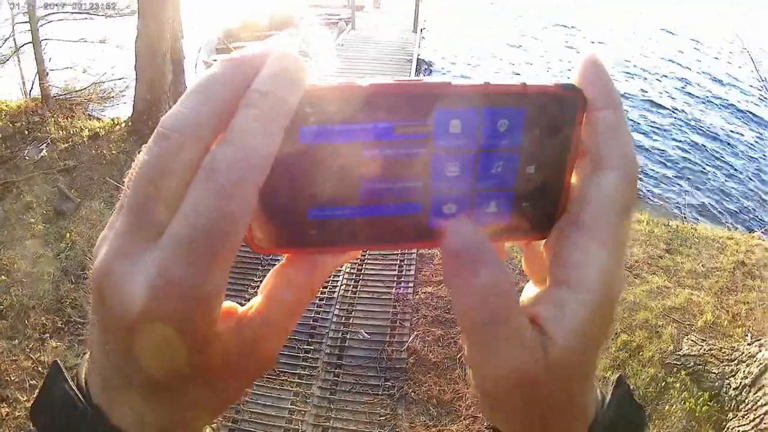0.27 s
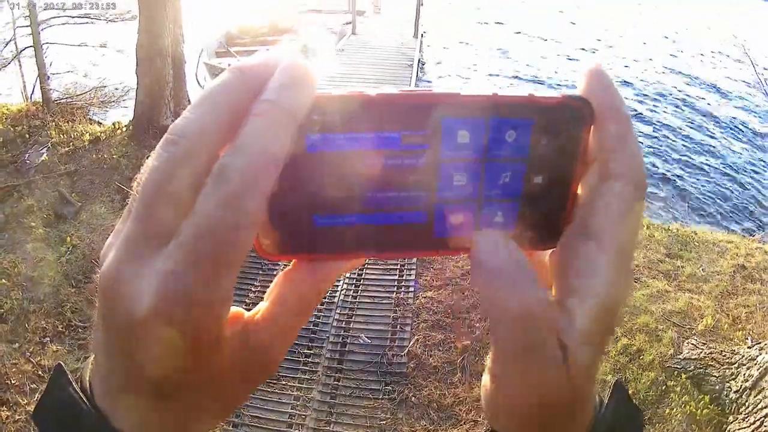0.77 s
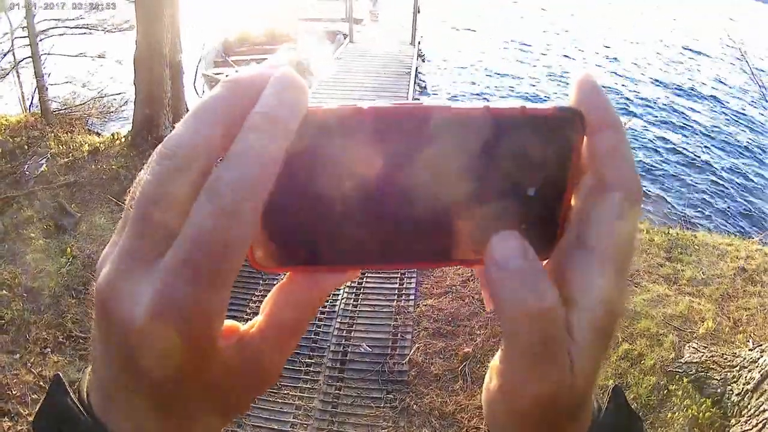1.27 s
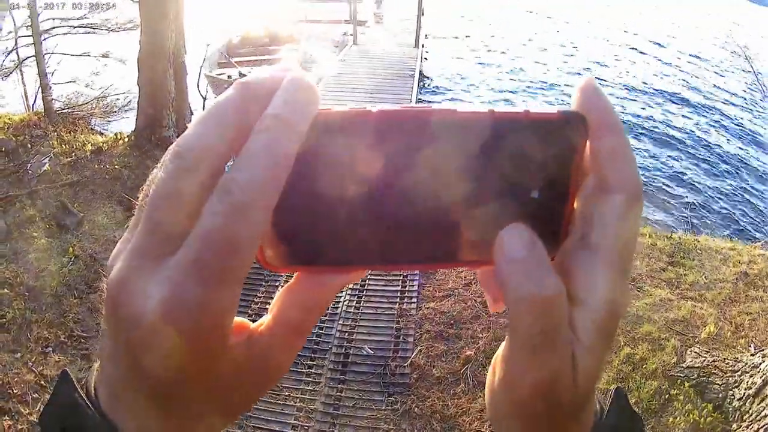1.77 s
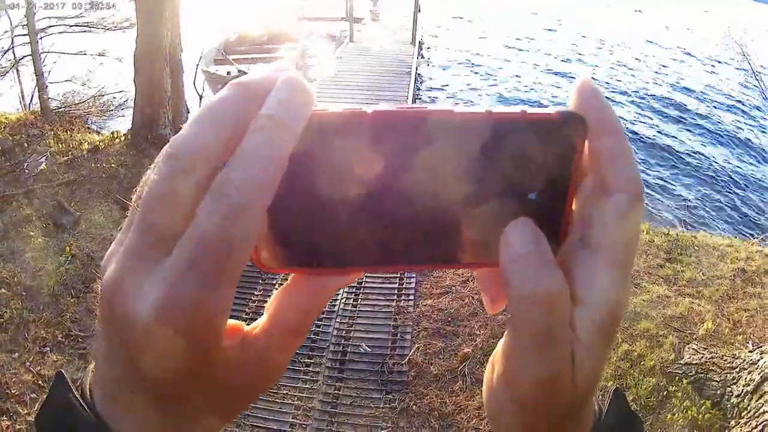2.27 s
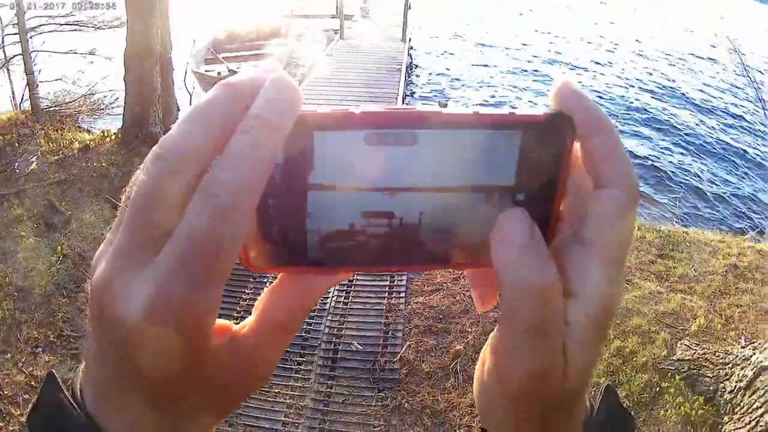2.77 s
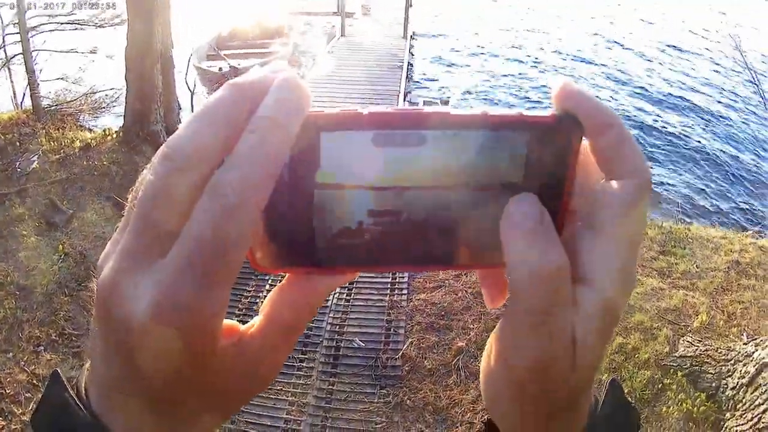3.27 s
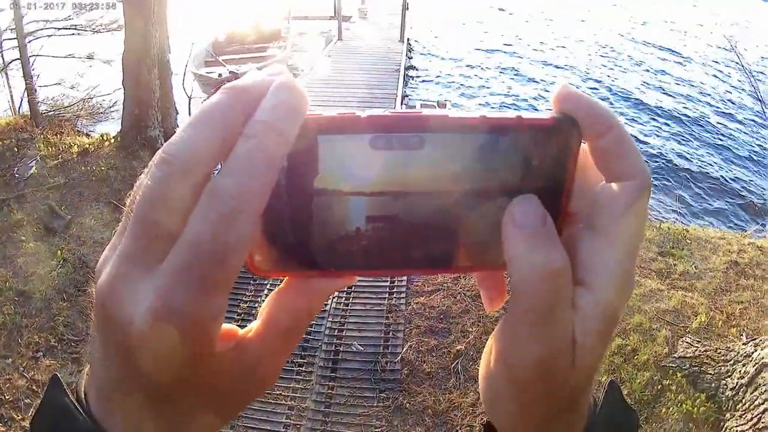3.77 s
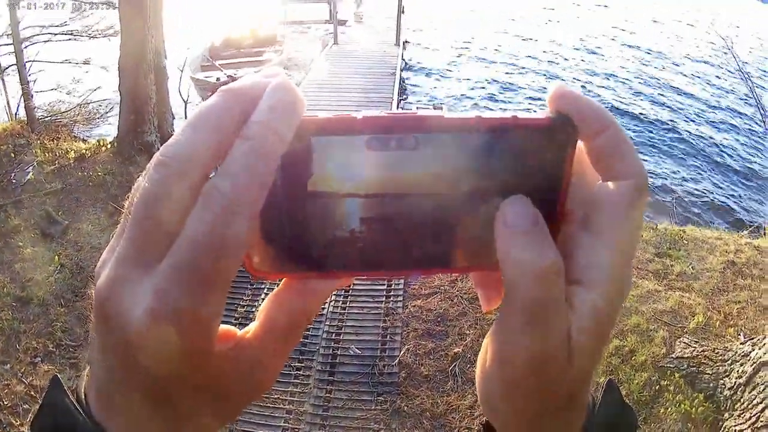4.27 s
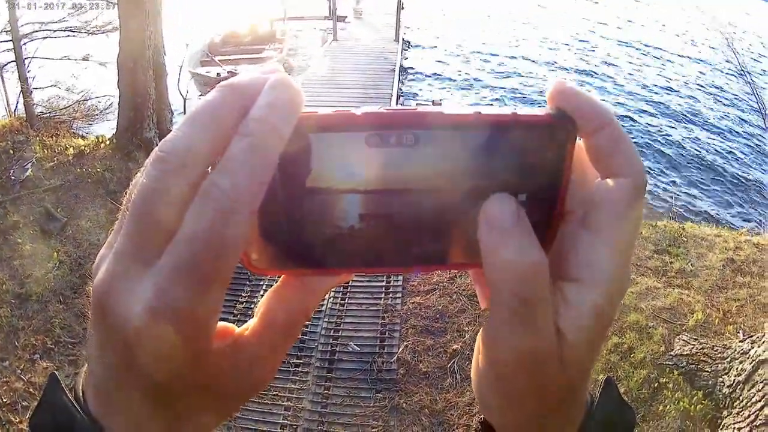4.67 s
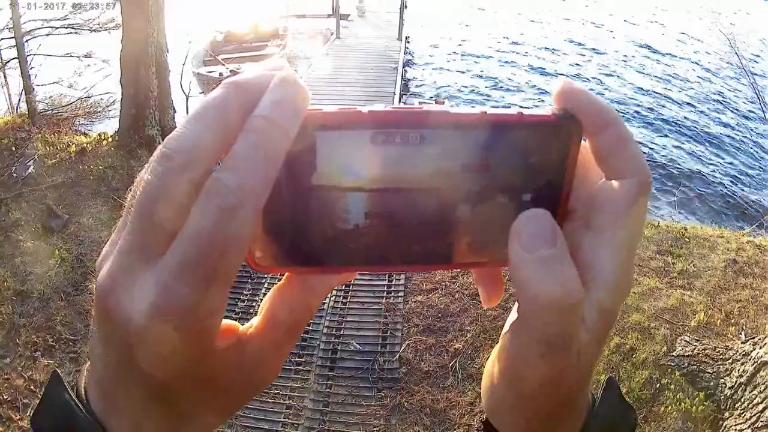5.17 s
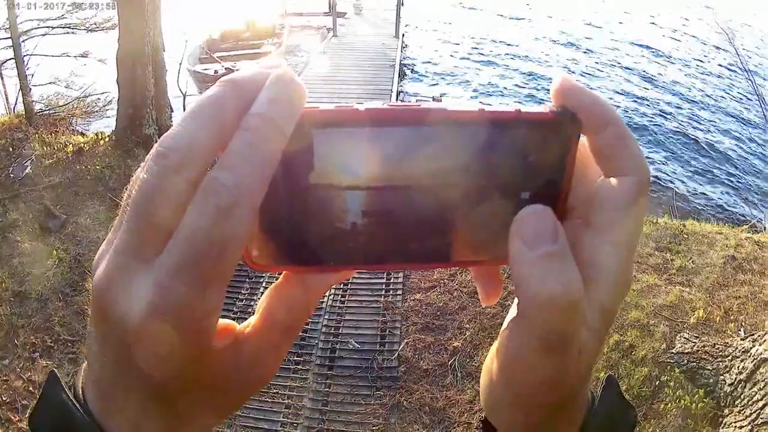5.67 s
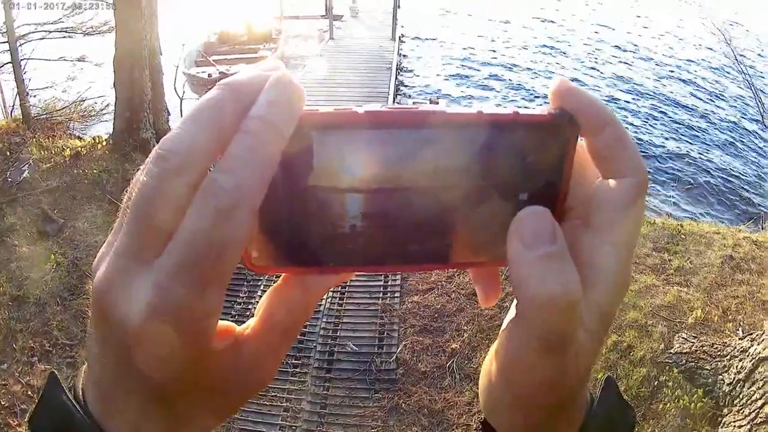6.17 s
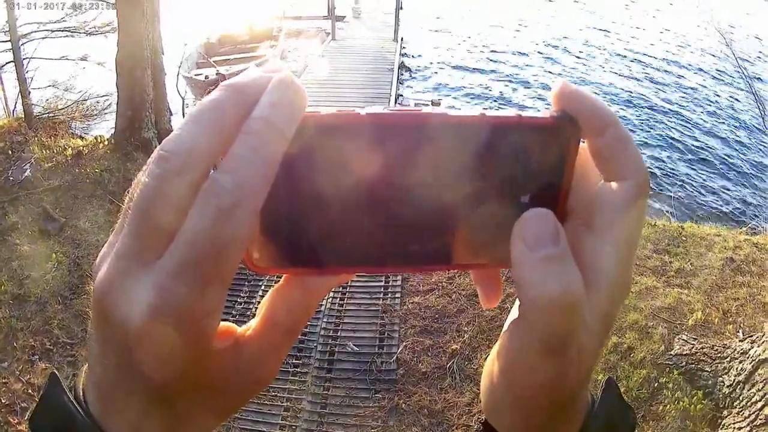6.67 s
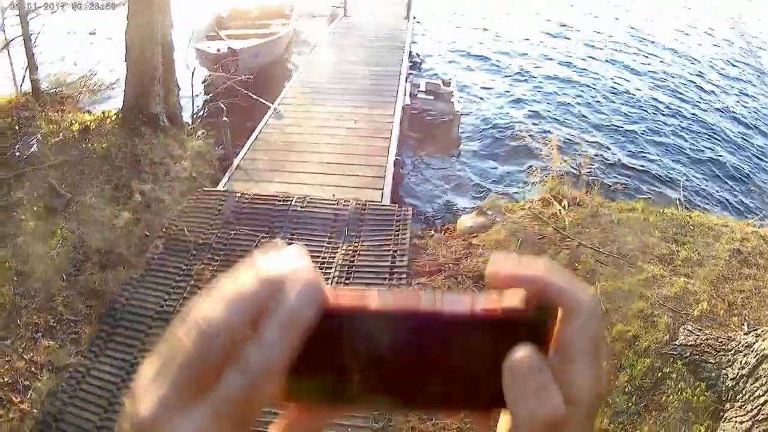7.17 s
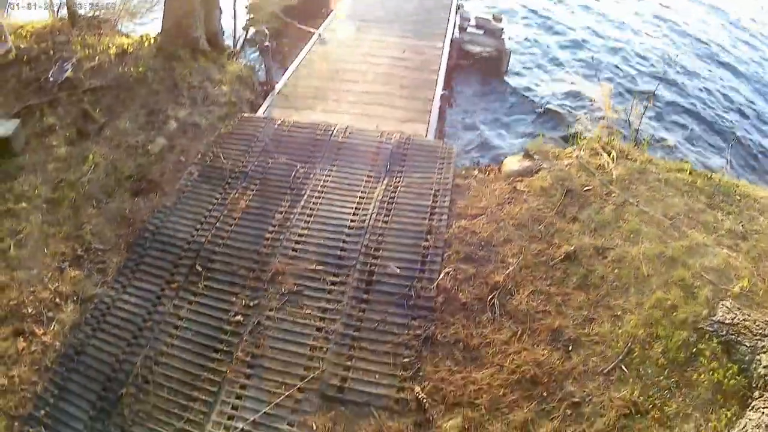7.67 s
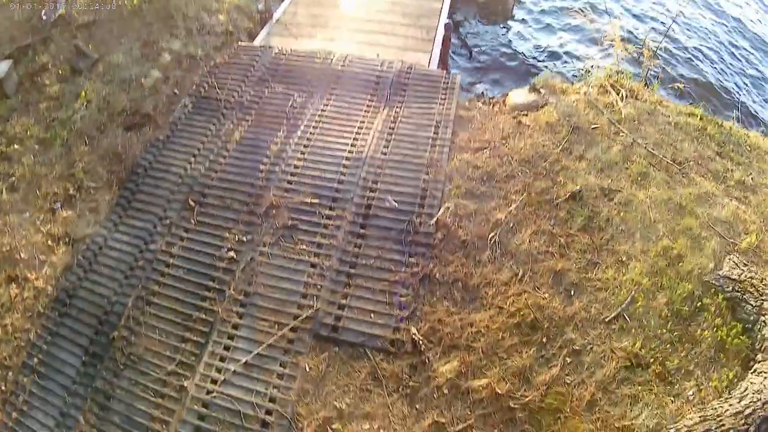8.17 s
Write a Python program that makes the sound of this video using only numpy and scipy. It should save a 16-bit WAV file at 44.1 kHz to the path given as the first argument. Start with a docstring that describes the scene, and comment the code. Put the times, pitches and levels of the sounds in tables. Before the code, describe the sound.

A windy lakeside heard through a small, band-limited camera microphone a few metres from a wooden dock. From 0 s, quiet choppy water laps and gurgles under boards, mostly midrange and bubbly, with thin spray. Surges leap up quickly and sink back, with soft knocks around 0.2 and 0.45 s and a calmer gap near 1 s. A clearer hollow wood knock with splash comes at 1.4 s, others near 1.9, 2.3, 2.7 and 3.4 s, irregular and short. Brief bubbling gulps, mostly gliding upward, fill between, thickest around 4-4.5 s. Another knock falls at 5.35 s. Lapping swells around 6.1 s as wind puffs strengthen. From 6.6 to 8 s, heavy low wind buffeting thumps and flattens on the microphone, over fuller water and dull knocks near 7.3, 7.5, 7.6 and 7.9 s. Wind eases towards 8.4 s, after a last dull knock. Faint hiss and very weak high whine persist.

```python
"""A wooden dock on a lake: choppy water laps and gurgles under it and knocks its boards and a moored hull.
Shaped noise and swarms of ringing bubbles make the lapping. Lapping, spray and wind leap up together and sink
back, often at a knock. Gliding tones are air pockets closing under the boards; damped wood modes with splashes
are the knocks. Clipped low noise is wind on the microphone port of a small chest camera some metres away,
harder towards the end. The camera samples slowly, so faint mirror images of the low sounds stand in the treble."""
import sys
import numpy as np
from scipy import signal
from scipy.fft import rfft, irfft, next_fast_len
from scipy.io import wavfile
from scipy.ndimage import uniform_filter1d, map_coordinates

SR = 44100
rng = np.random.default_rng(int(sys.argv[2]) if len(sys.argv) > 2 else 0)


def dump(signal):
    """Clip the signal to [-1, 1] and save it as 16-bit WAV at the path in sys.argv[1]."""
    limited = np.clip(np.atleast_2d(signal).T, -1, 1)
    pcm = np.round(limited * 32767).astype(np.int16)
    wavfile.write(sys.argv[1], SR, pcm)


N = 371319  # length [samples]

# Surges of wind noise on the port, many of them at knocks:
# (time [s], hold [s], buffet level before trim [dB], boom level before trim [dB])
WIND_SURGES = [(0, 0.092, -67, -55), (0.227, 0.07, -76, -58), (0.453, 0.054, -73.5, -44),
               (.56, 0.12, -60, -57), (0.683, 0.061, -69, -50.5), (1.381, 0.1, -46.5, -44),
               (1.592, .1, -63, -59), (1.77, 0.046, -58, -51), (1.868, 0.085, -55.5, -54.5),
               (2.295, 0.11, -53.5, -52.5), (2.458, 0.066, -54, -71), (2.734, .08, -57, -53),
               (2.847, 0.028, -45, -60), (2.912, 0.081, -50.5, -49), (3.098, 0.11, -54, -57),
               (3.388, 0.098, -41.5, -51.5), (3.68, 0.083, -67, -59.5), (3.86, 0.095, -49, -63),
               (4.11, 0.039, -54, -61), (4.36, 0.051, -37, -43.5), (4.52, 0.043, -50, -69),
               (4.778, 0.073, -51.5, -56), (4.97, 0.039, -62, -66), (5.348, 0.032, -51, -44.5),
               (5.443, 0.054, -48, -62), (5.566, .12, -46, -56.5), (5.733, 0.048, -62, -59),
               (6.025, .05, -43.5, -57), (6.109, 0.17, -35.5, -44), (6.487, 0.11, -45, -54.5),
               (6.634, 0.07, -34.5, -49), (6.725, 0.033, -28, -36.5), (6.95, 0.063, -42, -50),
               (7.176, 0.097, -29.5, -39.5), (7.337, 0.087, -34, -39.5), (7.446, .06, -40, -39.5),
               (7.562, 0.23, -48, -45.5), (7.799, 0.067, -27.5, -38.5), (7.93, 0.052, -32.5, -42.5),
               (8.171, .12, -37.5, -47.5)]
# Steady wind under the surges: (time [s], buffet level before trim [dB])
BREEZE = [(0, -64), (.8, -63), (1.2, -69.5), (1.7, -61), (2.2, -62), (3, -57.5), (4, -56), (4.7, -64),
          (5.2, -58), (5.8, -52), (6.501, -45), (6.9, -34), (7.7, -33.5), (8.1, -44), (8.42, -59)]
# Wind on the port: (frequency [Hz], relative density [dB per Hz])
RUMBLE_SPECTRUM = [(7.1, -30), (12, -9.5), (24, 6), (36, -2.5), (65, -1.5), (120, -7.5), (160, -36.5),
                   (260, -120)]
# Faster eddies and the hollow under the boards: (frequency [Hz], relative density [dB per Hz])
BOOM_SPECTRUM = [(50, -39), (85, -15.5), (120, -5.5), (170, -3), (260, -8.5), (400, -29), (800, -91.5)]
WIND_RISE_S = 0.016
BUFFET_FADE_DB_S, BOOM_FADE_DB_S = 150, 150.5
BREEZE_REF_DB = -65  # breeze at which the calm levels hold
BREEZE_BOOM_DB, BOOM_GROWS = -71, 0.66  # level before trim at that breeze; dB of boom per dB of breeze

# Blows of water and hull on wood: (time [s], level before trim [dB], favoured pitch [Hz],
# sharpness, as level of the high modes before trim [dB], 60 dB decay time at 800 Hz [s])
KNOCKS = [(0.221, -50, 775, -6, 0.036), (0.23, -46.5, 464, -2.5, 0.019), (0.442, -42.5, 754, -8, 0.036),
          (0.524, -43.5, 680, -32, 0.04), (0.907, -50.5, 705, -29, 0.031),
          (1.384, -33.5, 890, -12.5, 0.042), (1.633, -52, 770, -22, 0.099),
          (1.891, -38.5, 965, -16.5, 0.056), (1.92, -45, 759, -14, 0.032), (1.979, -55, 799, 2, 0.021),
          (2.294, -39, 520, -12, 0.015), (2.319, -31, 780, -12, 0.025), (2.505, -45.5, 860, -13, 0.039),
          (2.719, -46, 720, -32, 0.034), (2.734, -38.5, 740, -10, 0.11), (2.974, -43, 700, -9, 0.19),
          (3.081, -47.5, 824, -26, 0.02), (3.327, -39.5, 596, -26, 0.026), (3.369, -34, 700, -11.5, 0.073),
          (3.687, -47.5, 557, -14, 0.053), (3.744, -49.5, 493, -13, 0.028), (3.829, -58, 490, -14, 0.045),
          (3.885, -43, 626, -12, 0.017), (4.054, -45, 452, -12, 0.04), (4.156, -42, 674, -1.5, 0.14),
          (4.358, -51, 603, 0, 0.05), (4.378, -41, 452, -8, 0.074), (4.69, -50.5, 750, -33, 0.046),
          (4.769, -47.5, 756, -29, 0.054), (4.954, -46, 754, -30, 0.041), (5.348, -37.5, 800, -11, 0.02),
          (5.531, -48, 510, -15, 0.025), (5.768, -50, 748, -25, 0.076), (5.935, -43, 670, -32, 0.043),
          (6.136, -40, 510, -26, 0.026), (6.197, -40, 620, -25, 0.023), (6.355, -44.5, 840, -12, 0.079),
          (7.159, -44, 735, -33, 0.043), (7.308, -35, 750, -30, 0.074), (7.354, -38, 552, -23, 0.053),
          (7.466, -33.5, 755, -31, 0.098), (7.51, -49, 789, 10, 0.025), (7.626, -32, 700, -34, 0.049),
          (7.651, -45.5, 600, -7, 0.033), (7.932, -32, 770, -21.5, 0.034), (8.234, -38, 775, -24, 0.1)]
# Modes of the wood: (frequency [Hz], relative level [dB])
WOOD_MODES = [(480, 4.5), (620, -15.5), (760, 8), (960, 1.5), (1210, 1.5), (1430, -4.5), (1750, -21),
              (2250, -8), (2700, -20)]
CREST_S = 0.0026  # build-up of a blow of sharpness -14 dB
SOFTEN = 0.4  # dB of build-up time gained per dB of lost sharpness

# Air pockets closing under the boards:
# (time [s], length [s], first pitch [Hz], last pitch [Hz], level before trim [dB])
GLUGS = [(0.032, 0.017, 720, 890, -62), (0.243, 0.035, 433, 485, -58), (0.435, 0.059, 232, 255, -43.5),
         (0.53, 0.024, 1110, 1420, -56.5), (0.616, 0.038, 692, 800, -54), (0.673, 0.067, 220, 288, -52),
         (1.25, 0.063, 253, 222, -63), (1.405, 0.1, 135.7, 110, -47.5), (1.631, 0.019, 412, 467, -53),
         (1.778, 0.047, 228, 287, -51.5), (1.858, 0.021, 1510, 1620, -62), (1.945, .035, 1098, 1190, -61),
         (2.022, 0.019, 610, 647, -51), (2.195, 0.015, 1220, 1290, -61), (2.24, 0.016, 700, 800, -57.5),
         (2.317, 0.038, 278, 325, -51), (2.729, 0.028, 1400, 1580, -55), (3.022, 0.033, 425, 523, -55),
         (3.131, 0.04, 332, 430, -58.5), (3.218, 0.063, 370, 407, -58), (3.363, 0.044, 768, 730, -46),
         (3.76, 0.11, 291.6, 813, -54.5), (3.974, .025, 1280, 1350, -66), (4.017, 0.046, 381, 500, -56.5),
         (4.032, 0.017, 1270, 1470, -57.5), (4.079, .06, 752, 770, -58), (4.148, 0.031, 1443, 1550, -56),
         (4.196, 0.02, 1170, 1220, -63), (4.28, 0.043, 482, 526, -57), (4.316, 0.054, 399, 410, -55),
         (4.392, 0.037, 963, 1040, -52.5), (4.432, 0.024, 920, 1000, -55), (4.473, 0.021, 340, 483, -55),
         (4.771, 0.026, 244, 304, -56), (4.966, 0.064, 724, 930, -56.5), (5.562, 0.031, 466, 615, -62),
         (5.62, 0.041, 430, 380, -55.5), (5.762, 0.036, 347, 443, -48.5), (5.83, 0.064, 505, 825, -56),
         (6.669, 0.023, 700, 755, -52), (6.913, 0.018, 444, 484, -41), (7.864, 0.037, 520, 603, -49.5),
         (8.235, 0.025, 385, 463, -42), (8.28, 0.018, 426, 446, -43.5)]

# Surges in which lapping and spray leap up and sink back, many of them at knocks:
# (time [s], rise [s], lapping level [dB], spray level before trim [dB])
WATER_SURGES = [(0, 0.0034, -55, -75), (.22, 0.014, -58, -78.5), (0.437, 0.0048, -50.5, -69.5),
                (.66, 0.067, -53, -72), (.95, 0.037, -63.5, -84.5), (1.28, 0.062, -60.5, -83),
                (1.383, 0.022, -51, -68.5), (1.6, 0.047, -57, -75), (1.76, 0.029, -58, -73),
                (1.87, 0.022, -48.5, -68), (2.292, 0.025, -48.5, -66), (2.5, .05, -60, -82),
                (2.716, 0.021, -51, -67), (2.9, 0.047, -52, -71), (3.12, 0.059, -53, -77.5),
                (3.3, 0.021, -49, -68), (3.74, .015, -55.5, -79.5), (3.85, 0.04, -58, -73.5),
                (4.02, 0.059, -53, -73), (4.13, 0.015, -57, -76.5), (4.349, 0.036, -49, -69.5),
                (4.765, 0.0079, -59, -79), (4.9, 0.062, -58.5, -77), (5.346, .008, -51, -69.5),
                (5.5, 0.067, -55, -76), (5.68, 0.059, -51, -71.5), (5.92, .03, -56.5, -79),
                (6.069, .1, -45, -66), (6.52, .1, -53.5, -73.5), (6.7, 0.07, -48, -69.5),
                (6.84, 0.045, -52, -71), (6.97, 0.024, -49, -72.5), (7.15, 0.033, -49.5, -68.5),
                (7.33, 0.021, -46.5, -66), (7.5, 0.12, -47.5, -70), (7.72, 0.029, -49.5, -67.5),
                (7.899, 0.04, -46, -69.5), (8.15, 0.073, -49, -66.5)]
# Lapping through the camera case: (frequency [Hz], relative density [dB per Hz])
WASH_SPECTRUM = [(150, -27), (250, -5), (290, -0.5), (323, -4.5), (427, -2), (569, -4.5), (742, 1.5),
                 (1090, -11.5), (1460, -33.5), (1600, -33), (2080, -54), (3520, -120)]
# Spray and splashes: (frequency [Hz], relative density [dB per Hz])
SPRAY_SPECTRUM = [(650, -31), (1100, -3.5), (1190, -5), (1360, -7.5), (1460, -9), (1830, -14), (2220, -11),
                  (2840, -27), (3050, -32.5), (3960, -45), (6710, -120)]
# Finest spray: (frequency [Hz], relative density [dB per Hz])
MIST_SPECTRUM = [(1500, -25), (2800, -0.5), (3900, -1.5), (4200, -61)]
LAP_FADE_DB_S, SPRAY_FADE_DB_S = 52.5, 34.5  # how fast lapping and spray sink back after a surge
CALM_LAP_DB, CALM_SPRAY_DB = -70.5, -85  # between surges at the reference breeze, spray before trim
CALM_GROWS = 0.44  # dB of calm lapping and spray per dB of breeze

# Faint electronic tones: (frequency [Hz], level before interpolation [dB])
WHINE = [(4000, -97), (3937.5, -96)]
SAMPLE_HZ, TOP_HZ = 8000, 15500  # the camera's sampling rate and the top of its output


def amp(db):
    """Decibels to an amplitude ratio."""
    return 10 ** (np.asarray(db) / 20)


def unit(x):
    """Normalisation to unit rms."""
    return x / np.sqrt(np.mean(x ** 2) + 1e-20)


def wobble(rate):
    """Interpolation: a smooth random curve through `rate` knots a second."""
    knots = rng.standard_normal(int(N * rate / SR) + 4)
    return map_coordinates(knots, [np.arange(N) * rate / SR])


def filtered(x, response):
    """Linear filtering: the spectrum of x times a response of frequency."""
    m = next_fast_len(N + 8192)
    spectrum = rfft(x, m) * response(np.fft.rfftfreq(m, 1 / SR))
    return irfft(spectrum, m)[..., :N]


def coloured(x, spectrum):
    """Spectral shaping by points joined on a log-frequency axis, at unit rms."""
    f, db = np.transpose(spectrum)

    def response(hz):
        return amp(np.interp(np.log(hz + 1), np.log(f + 1), db))

    return unit(filtered(x, response))


def patchy(patchy_db, bins, frames):
    """Time-frequency modulation: white noise with smoothed patches of random gain."""
    z = signal.stft(rng.standard_normal(N), nperseg=1024)[2]
    field = uniform_filter1d(rng.standard_normal(z.shape), bins, 0)
    field = uniform_filter1d(field, frames, 1)
    return signal.istft(z * amp(patchy_db * unit(field)), nperseg=1024)[1][:N]


def swells(start_s, rise_s, hold_s, peak_db, fade_db_s, calm_db):
    """Power summation: level in dB of events that rise, hold and fade over a calm level."""
    step = 32  # samples between computed points
    grid = np.arange(0, N + step, step)
    t = grid / SR - start_s[:, None]
    rise = np.clip(t / np.maximum(rise_s, .002), 0, 1)
    fade_db = fade_db_s * np.maximum(t - rise_s - hold_s, 0)
    shape = rise * amp(peak_db[:, None] - fade_db)
    power = np.interp(np.arange(N), grid, np.sum(shape ** 2, 0))
    return 10 * np.log10(power + amp(calm_db) ** 2)


def surges():
    """Level summation: surges of buffet, boom, lapping and spray over calm floors that follow the breeze."""
    s, hold, buffet_db, boom_db = np.transpose(WIND_SURGES)
    breeze_db = np.interp(np.arange(N) / SR, *np.transpose(BREEZE))
    over_db = breeze_db - BREEZE_REF_DB
    calm_boom_db = BREEZE_BOOM_DB + BOOM_GROWS * over_db
    buffet = swells(s, WIND_RISE_S, hold[:, None], buffet_db, BUFFET_FADE_DB_S, breeze_db)
    boom = swells(s, WIND_RISE_S, hold[:, None], boom_db, BOOM_FADE_DB_S, calm_boom_db)

    s, rise, lap_db, spray_db = np.transpose(WATER_SURGES)
    growth_db = CALM_GROWS * over_db
    lap = swells(s, rise[:, None], 0, lap_db, LAP_FADE_DB_S, CALM_LAP_DB + growth_db)
    spray = swells(s, rise[:, None], 0, spray_db, SPRAY_FADE_DB_S, CALM_SPRAY_DB + growth_db)
    return buffet, boom, lap, spray


def wind(buffet_db, boom_db):
    """Turbulence and saturation: slow and fast eddies share their lumps, and strong pushes flatten."""
    eddies = amp(1.9 * wobble(40)) * rng.standard_normal(N)
    push = unit(np.tanh(0.53 * coloured(eddies, RUMBLE_SPECTRUM)))
    boom = unit(np.tanh(0.36 * coloured(eddies, BOOM_SPECTRUM)))
    return amp(buffet_db - 4.5) * push + amp(boom_db - 6.5) * boom


def knocks():
    """Modal excitation: a blow rings low modes near its pitch; a sharp one wakes high modes and splashes."""
    out, t = np.zeros(N + SR), np.arange(SR // 5) / SR
    hz, mode_db = np.transpose(WOOD_MODES)[:, :, None]
    high = hz > 1100
    water = coloured(rng.standard_normal(N), SPRAY_SPECTRUM)
    for s, db, centre_hz, sharp_db, t60 in KNOCKS:
        # Dull blows build up longer; all modes crest together, CREST_S after the listed time.
        build_s = CREST_S * amp(SOFTEN * (-14 - sharp_db))
        at = round((s + CREST_S - build_s) * SR)
        scatter_db = 2 * rng.standard_normal(hz.shape)
        detuned_db = -18 * np.abs(np.log2(hz / centre_hz))
        level_db = mode_db + scatter_db + np.where(high, sharp_db + 6.5, detuned_db)
        decay_db = 60 * t / (t60 * (800 / hz) ** .5)  # higher modes die sooner
        ring = np.sum(amp(level_db - decay_db) * np.cos(2 * np.pi * hz * (t - build_s)), 0)
        ring *= np.sin(np.pi / 2 * np.minimum(t / build_s, 1)) ** 2
        ring *= 1 + 0.22 * np.exp(-((t - build_s) / 0.0029) ** 2)  # emphasis at the crest
        splash = np.resize(water[at:], len(t)) * amp(sharp_db - 9 - 60 * t / 0.041)
        out[at:][:len(t)] += amp(db + 4.0) * (ring / np.max(np.abs(ring)) + splash)
    return out[:N]


def glugs():
    """Cavity resonance: a pocket swells and fades while its pitch glides ever faster, mostly upward."""
    out = np.zeros(N + SR)
    for s, length, first_hz, last_hz, db in GLUGS:
        u = np.arange(round(length * SR)) / (length * SR)
        hz = first_hz * (last_hz / first_hz) ** (u * u)
        shape = np.abs(np.sin(np.pi * u ** 1.02))
        tone = np.sin(2 * np.pi * np.cumsum(hz) / SR)
        out[round(s * SR):][:len(u)] += amp(db + 3.0) * shape * tone
    return out[:N] * amp(2.5 * wobble(90))  # the ring throbs a little


def bubble(t, hz, t60, rise, attack):
    """Bubble resonance: a pocket of air rings and climbs in pitch as it nears the surface."""
    phase = 2 * np.pi * hz * (t + rise * t * t / (2 * t60))
    return np.sin(phase) * amp(-60 * t / t60) * (1 - np.exp(-t / attack))


def gurgle(count, centre_hz, spread, cycles, size_db):
    """Random superposition: a swarm of small bubbles of scattered pitch, life and level, at unit rms."""
    u, g = rng.random((count, 2)), rng.standard_normal((count, 2))
    hz = centre_hz * np.exp(spread * np.clip(g[:, :1], -2, 1.5))
    t = np.arange(3000) / SR
    life = cycles * np.exp(.3 * g[:, 1:]) / hz  # 60 dB decay time [s]
    level_db = size_db * np.minimum(-np.log(1 - u[:, 1:]), 2.5)
    rows = amp(level_db) * bubble(t, hz, life, rise=0.23, attack=life / 8)
    at = (u[:, :1] * N).astype(int) + np.arange(len(t))
    return unit(np.bincount(at.ravel(), rows.ravel(), minlength=N)[:N])


def lapping(lap_db, spray_db):
    """Broadband splashing and bubble resonance: bubbly wash and a thinner fizz share a fast flutter."""
    flutter = wobble(25)
    wash = coloured(patchy(patchy_db=2.5, bins=5, frames=3), WASH_SPECTRUM)
    bubbles = gurgle(count=900, centre_hz=583.5, spread=0.3015, cycles=19.5, size_db=4.0)
    trickle = gurgle(count=160, centre_hz=482.1, spread=.35, cycles=58, size_db=3)
    body = unit(amp(0.94 * flutter) * wash + amp(-5) * bubbles + amp(-8.5) * trickle)

    spray = coloured(patchy(patchy_db=2.0, bins=14, frames=4), SPRAY_SPECTRUM)
    fizz = unit(amp(0.8 * flutter) * spray)
    drops = gurgle(count=400, centre_hz=1408, spread=.25, cycles=22, size_db=4.5)
    fizz = unit(fizz + amp(-9) * drops)

    mist = coloured(patchy(patchy_db=2.0, bins=12, frames=3), MIST_SPECTRUM)
    mist_db = 0.91 * (spray_db + 75) - 84.5  # mist swells less than spray
    return amp(lap_db) * body + amp(spray_db + 5.5) * fizz + amp(mist_db) * mist


def scene():
    """Superposition: the pressures of wind, knocks, glugs and lapping add."""
    buffet_db, boom_db, lap_db, spray_db = surges()
    return (wind(buffet_db, boom_db) + knocks() + glugs() + lapping(lap_db, spray_db))[None]


def record(dry):
    """Imaging: slow samples joined by straight lines mirror the sound about the sampling rate and its double."""
    t = np.arange(N) / SR
    x = filtered(dry[0], lambda hz: hz < SAMPLE_HZ / 2)
    ticks = np.arange(int(N / SR * SAMPLE_HZ) + 1) / SAMPLE_HZ
    samples = map_coordinates(x, [ticks * SR], order=3, mode="nearest")
    samples = samples + sum(amp(db) * np.cos(2 * np.pi * hz * ticks) for hz, db in WHINE)
    samples = samples + amp(-85) * rng.standard_normal(len(ticks))  # converter hiss
    return filtered(np.interp(t, ticks, samples), lambda hz: hz < TOP_HZ)[None]


dry = scene()
out = record(dry)
dump(out)
```